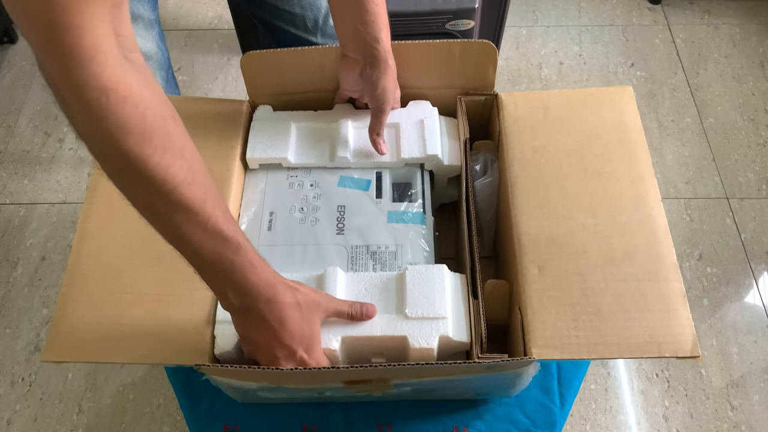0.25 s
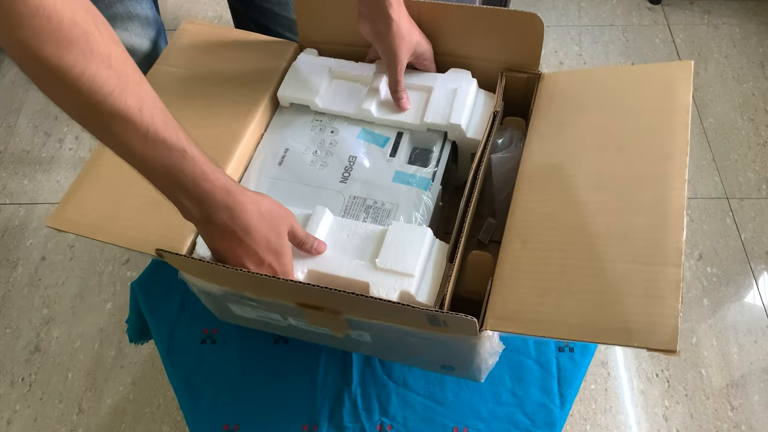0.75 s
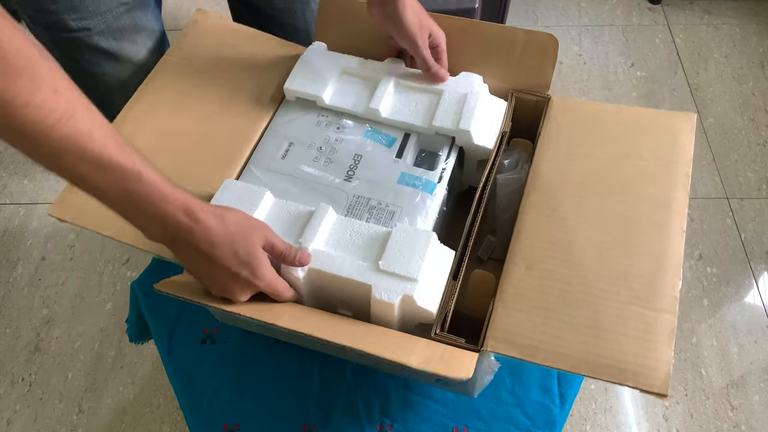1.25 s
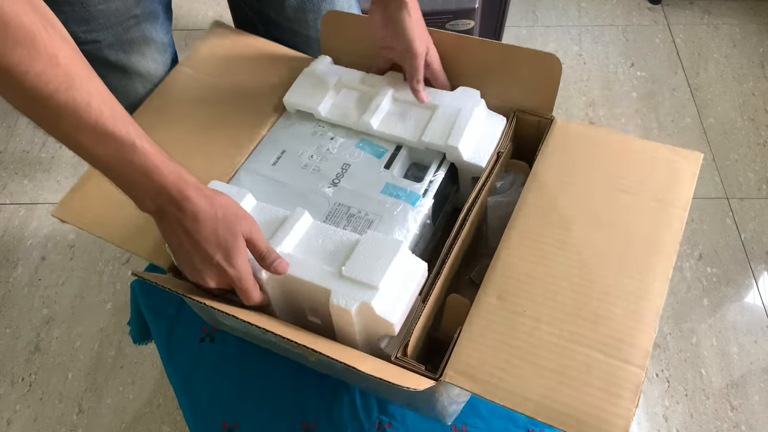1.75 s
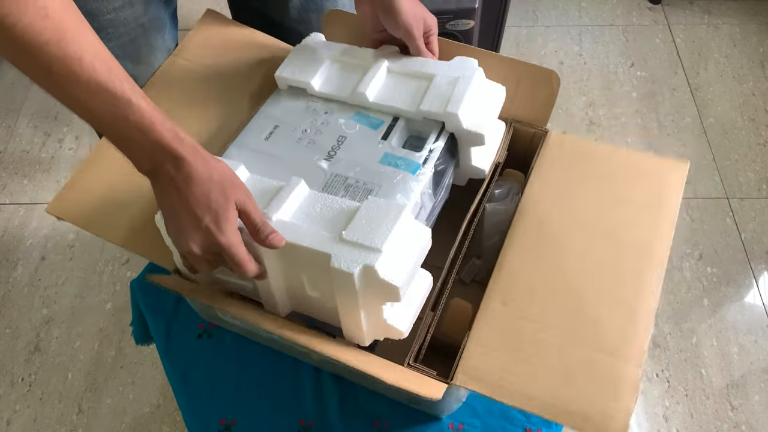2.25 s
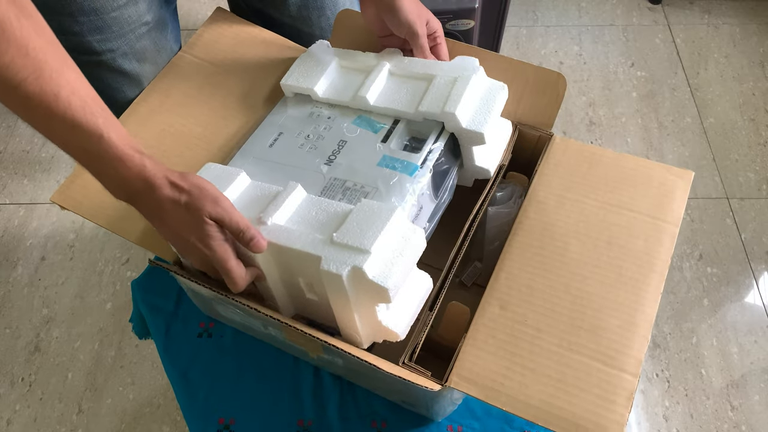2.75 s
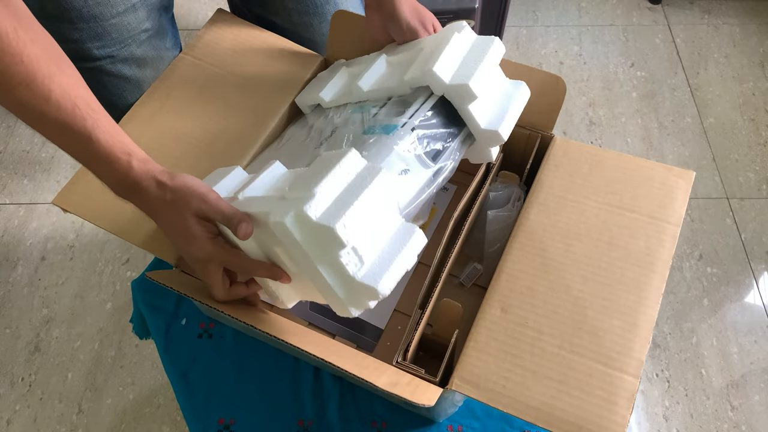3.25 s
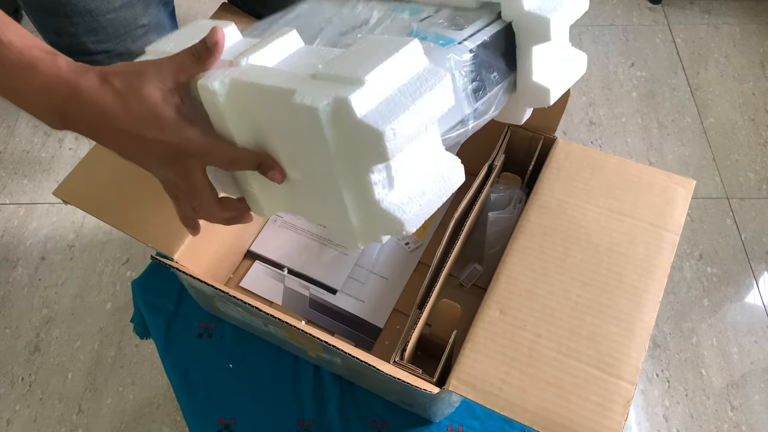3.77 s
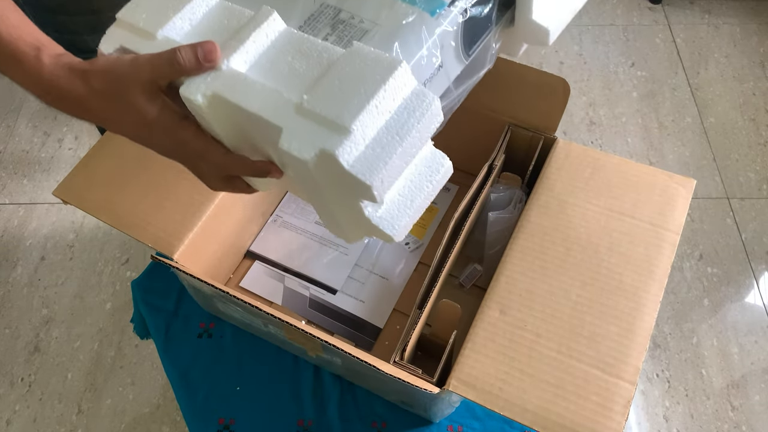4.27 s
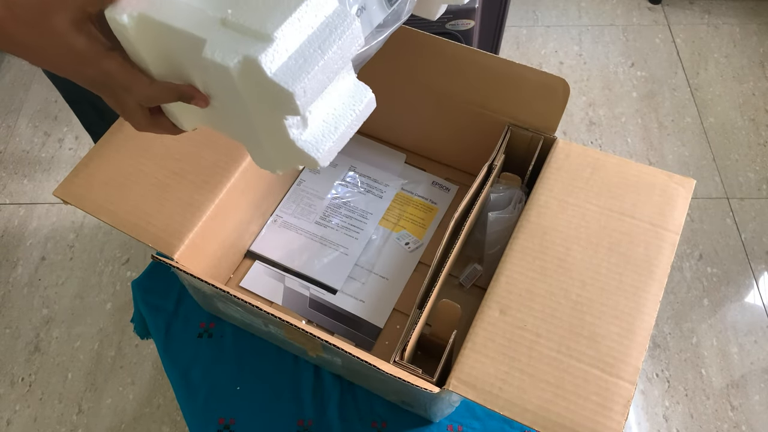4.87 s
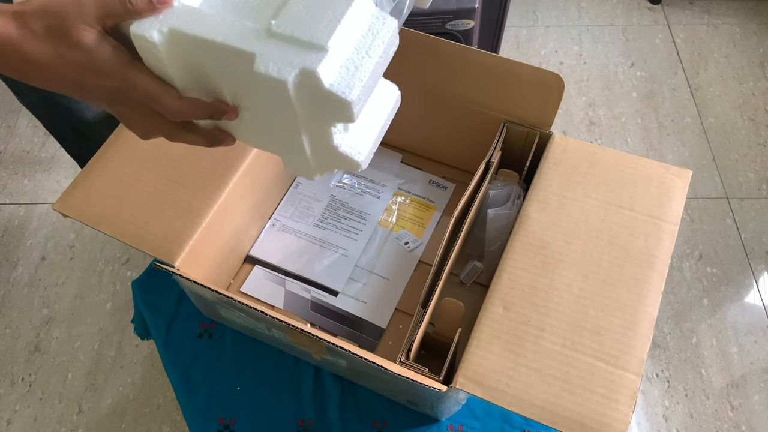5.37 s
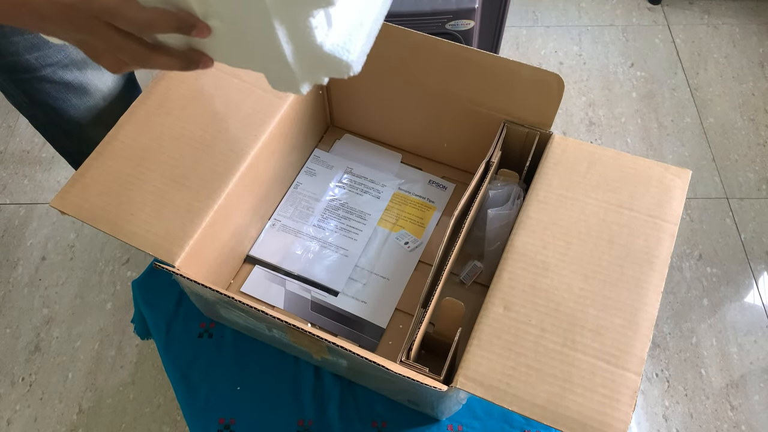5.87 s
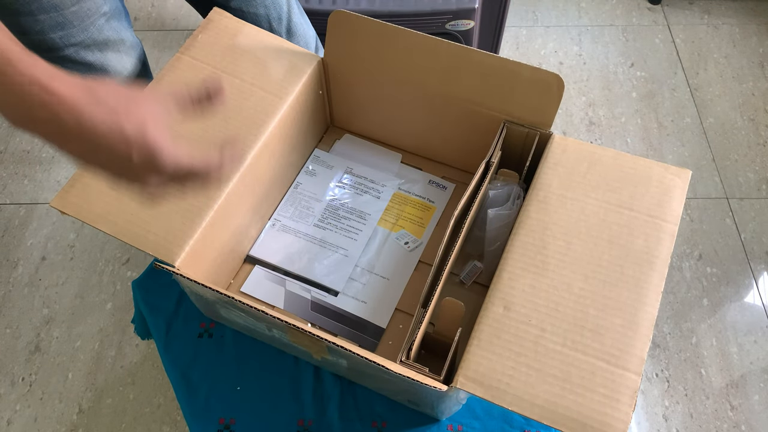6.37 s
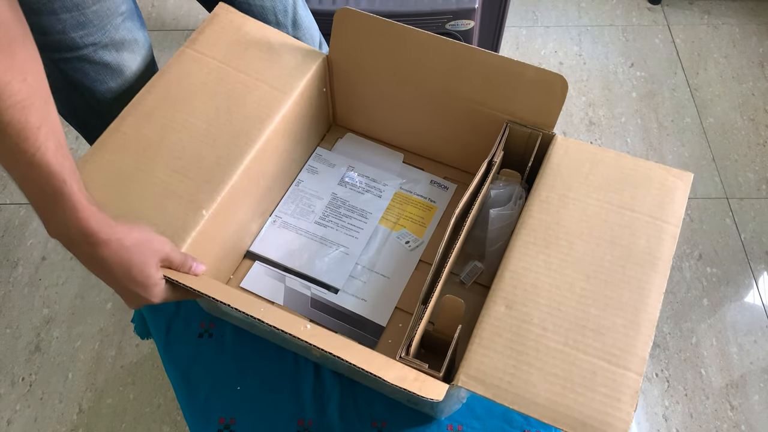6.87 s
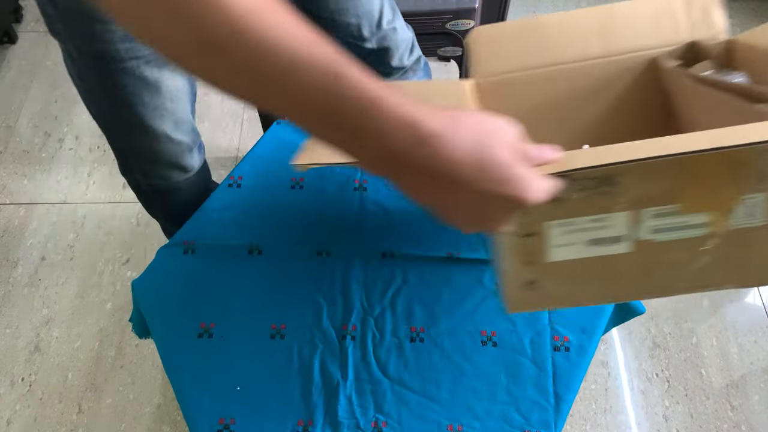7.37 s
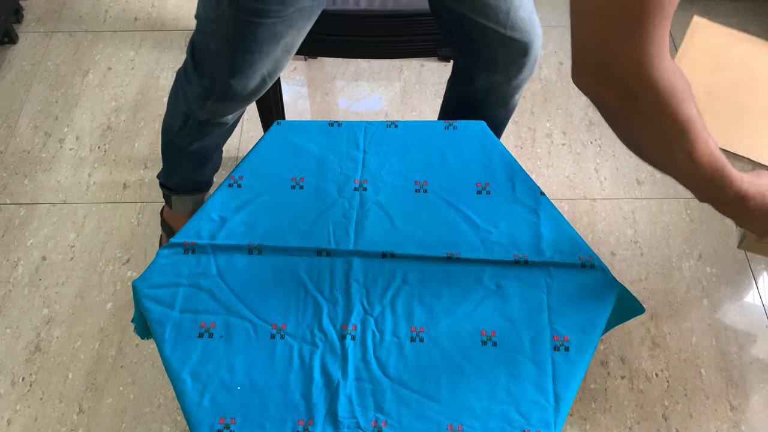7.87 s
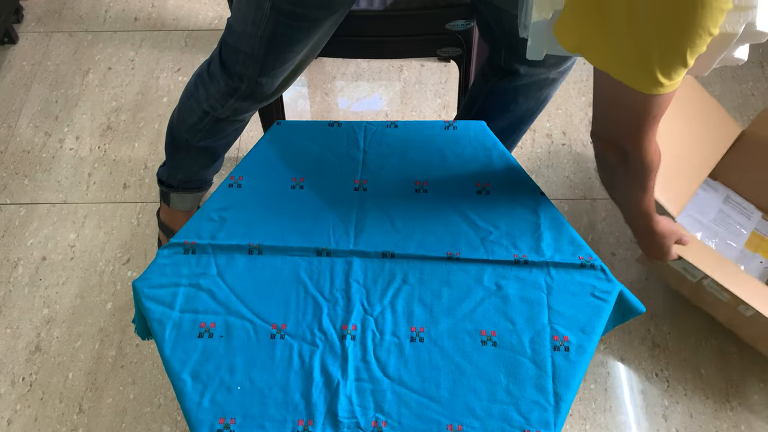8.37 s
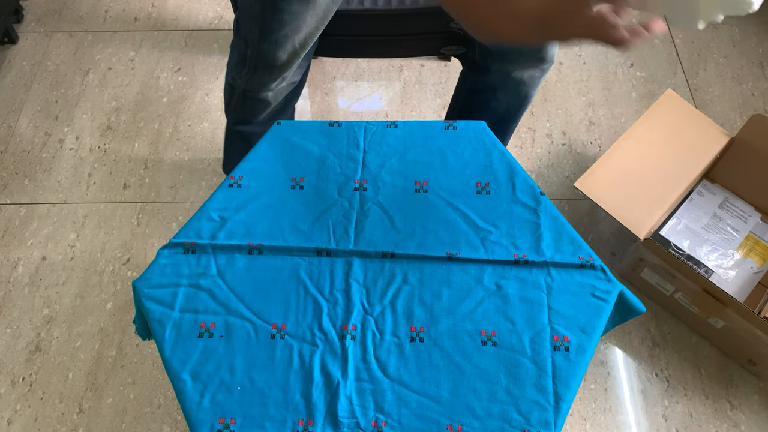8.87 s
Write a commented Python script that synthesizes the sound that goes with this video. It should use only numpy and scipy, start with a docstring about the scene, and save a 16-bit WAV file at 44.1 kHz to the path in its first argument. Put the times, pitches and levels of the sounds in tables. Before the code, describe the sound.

Polystyrene foam scrapes and squeaks out of a cardboard box as plastic wrap crackles, with hollow bumps before the box is set down.

```python
"""A fine, very bright scrape with short squeaks and snaps: polystyrene end caps stick and slip against
cardboard as a device is worked out of its box. Its plastic wrap crackles, panels rustle, gripped foam
creaks and stiff edges tick. The hollow box booms and knocks as it is bumped, then is carried aside and
set down in a hard-floored room."""
import sys
import numpy as np
from scipy import signal
from scipy.fft import rfft, irfft
from scipy.io import wavfile
from scipy.ndimage import uniform_filter1d

SR = 44100
rng = np.random.default_rng(int(sys.argv[2]) if len(sys.argv) > 2 else 0)


def store_pcm(level_fs):
    """Save levels as 16-bit WAV."""
    pcm = np.round(np.clip(level_fs, -1, 1) * 32767).astype(np.int16)
    wavfile.write(sys.argv[1], SR, np.atleast_2d(pcm).T)


N = 402480
TIME = np.arange(N) / SR


def undb(db):
    """Decibels to gain."""
    return 10 ** (np.asarray(db) / 20)


def unit(x):
    """Scale to an rms of 1."""
    return x / np.sqrt(np.mean(x ** 2))


def freqs(x):
    """Frequency of each bin of a signal's spectrum."""
    return np.arange(x.shape[-1] // 2 + 1) * SR / x.shape[-1]


def on_log_axis(hz, points):
    """Read (freq_hz, value) points on a log-frequency axis."""
    point_hz, value = np.transpose(points)
    return np.interp(np.log(np.maximum(hz, 1)), np.log(point_hz), value)


def colour(x, eq):
    """Shape a signal with an EQ curve of (freq_hz, gain_db) points."""
    return irfft(rfft(x) * undb(on_log_axis(freqs(x), eq)), x.shape[-1])


def drift(rate_hz):
    """Smooth random modulation with an rms of 1."""
    hold = max(int(SR / rate_hz), 2)
    steps = np.repeat(rng.standard_normal(N // hold + 1), hold)
    return unit(uniform_filter1d(uniform_filter1d(steps, hold), hold)[:N])


def add(track, start_s, sound):
    """Mix a sound into a track."""
    i = max(int(start_s * SR), 0)
    track[i:i + len(sound)] += sound[:max(N - i, 0)]


def slips(per_s, scatter_db, size=N):
    """Stick-slip: tiny jerks of unequal size at random moments."""
    happens = rng.random(size) < per_s / SR
    polarity = rng.choice([-1, 1], size)
    return happens * polarity * undb(scatter_db * np.clip(rng.standard_normal(size), -2, 2))


def stroke(length_s, attack_s, release_s, swell_db=0):
    """One second of envelope for a push: attack, a hold that can swell or sag, release."""
    t = TIME[:SR]
    progress = np.clip(t / max(length_s, .01), 0, 1)
    release = np.exp(-np.maximum(t - length_s, 0) / release_s)
    return np.minimum(t / attack_s, 1) * undb(swell_db * (progress - .5)) * release


# Pushes that shift the load, then the empty box: start_s, length_s, hiss_db, swell_db, rasp_db
PUSHES = [(0, 0.02, -34, -21, -38), (0.049, 0.04, -43, -5, -49), (0.12, 0.083, -42.5, 10.5, -46.5),
          (0.369, 0.16, -41, -0.5, -44.5), (0.581, 0.061, -49.5, 0, -48.5), (0.677, 0.21, -46.5, -9, -49),
          (0.913, 0.064, -31, 5, -60), (0.97, 0.17, -34.5, -9, -51), (1.096, 0.065, -32.5, 2.5, -60),
          (1.186, 0.027, -39.5, 0.5, -53), (1.272, 0.078, -54, 6, -69), (1.451, 0.15, -40.5, 27, -50),
          (1.71, 0.087, -31, -4, -35.5), (1.82, 0.089, -34, 12.5, -41), (1.947, 0.056, -39, 8.5, -39.5),
          (1.989, 0.083, -24.5, 5.5, -44.5), (2.097, 0.14, -28.5, -0.5, -41.5),
          (2.256, 0.097, -42, -5.5, -41), (2.378, 0.17, -36, 6.5, -41.5), (2.618, 0.11, -43.5, -8, -47.5),
          (2.722, 0.16, -29, 1, -36.5), (2.89, 0.091, -31.5, 2.5, -41.5), (2.976, 0.21, -38, 7.5, -41),
          (3.201, 0.036, -34.5, 9, -42), (3.305, 0.092, -39.5, -1, -43.5), (3.437, 0.23, -37.5, -2, -46.5),
          (3.704, 0.14, -38.5, -3, -42.5), (3.91, 0.08, -41, -2, -41), (4.036, 0.12, -36, 6, -44),
          (4.2, 0.18, -43.5, -8.5, -48), (4.368, 0.13, -39, 16, -53), (4.584, 0.13, -47.5, 8.5, -58.5),
          (4.732, 0.078, -42, -1, -55), (4.825, 0.11, -45.5, -2, -51), (4.974, 0.021, -33, 1.5, -70),
          (5.089, 0.11, -46, 3, -57), (5.274, 0.12, -53, -0.5, -54), (5.425, 0.063, -43.5, 1, -64),
          (5.5, 0.059, -39.5, 5.5, -59.5), (5.6, 0.12, -41, 13.5, -50), (5.77, 0.11, -55.5, 9.5, -72),
          (5.897, 0.21, -38.5, 0.5, -53), (6.127, 0.037, -43.5, 4, -51.5), (6.215, 0.16, -43, -8, -58),
          (6.373, 0.16, -54, 7, -70), (6.66, .02, -59, 0.5, -84), (6.743, 0.43, -55.5, 5.5, -55),
          (7.152, 0.45, -54.5, -2.5, -63), (7.572, 0.077, -49, 3, -55), (7.677, 0.26, -62.5, -12, -62),
          (7.962, 0.33, -64, -11.5, -68), (8.342, 0.18, -52.5, -12, -53.5), (8.503, 0.069, -40.5, 6.5, -43),
          (8.662, 0.093, -47.5, 20.5, -56.5), (8.777, 0.055, -51.5, 2, -49), (8.901, 0.029, -26, -1, -39.5),
          (8.973, 0.17, -47, -8, -49)]


def push_envelopes():
    """Foam hiss dies sooner than cardboard rasp after each push; overlapping pushes add in power."""
    power = np.zeros((2, N))
    for start_s, length_s, hiss_db, swell_db, rasp_db in PUSHES:
        hiss = stroke(length_s, attack_s=.035, release_s=.04, swell_db=swell_db)
        rasp = stroke(length_s, attack_s=.035, release_s=.067, swell_db=swell_db)
        add(power[0], start_s, (undb(hiss_db) * hiss) ** 2)
        add(power[1], start_s, (undb(rasp_db) * rasp) ** 2)
    return np.sqrt(power)


# Bright sizzle of foam: freq_hz, gain_db
FOAM_EQ = [(300, -59.5), (1000, -51.5), (1250, -22), (1550, -17), (2200, -31), (2900, -19), (5400, -18.5),
           (7600, -12), (8150, 2.5), (10000, 1.5), (12500, 2.5), (15500, 1)]
# Fuller rasp of cardboard: freq_hz, gain_db
CARDBOARD_EQ = [(300, -16), (800, -11.5), (1400, -7.5), (2200, -4.5), (3100, -2.5), (4200, -9.5),
                (6000, -7), (8000, 3), (11000, -8.5), (16000, -32.5)]


def scraping(hiss, rasp):
    """Foam beads catch and slip thousands of times a second; the cardboard rasps in gritty surges."""
    pressure = drift(110)
    beads = unit(colour(slips(per_s=5500, scatter_db=-1.5), FOAM_EQ))
    fibres = shifting_contact(colour(slips(per_s=1100, scatter_db=4), CARDBOARD_EQ))
    surges = undb(1.8 * drift(32))
    return beads * hiss * undb(1.7 * pressure + 6.5) + fibres * surges * rasp * undb(.44 * pressure - 1)


def shifting_contact(x):
    """As the contact shifts, each half-octave band swells and sinks on its own."""
    centres_hz = 1000 * 2 ** np.arange(0, 3.6, .5)
    spectrum, hz, out = rfft(x), freqs(x), 0
    for share in np.eye(len(centres_hz)):
        band = irfft(spectrum * on_log_axis(hz, list(zip(centres_hz, share))), N)
        out = out + band * undb(2.6 * drift(18))
    return unit(out)


# Crisp tone of the wrap: freq_hz, gain_db
WRAP_EQ = [(500, -22.5), (1500, -5.5), (4000, -5.5), (8000, -7.5), (9700, -15.5), (11500, 3.5), (15000, 5)]
# Level ride on the crackle, highest while the load hangs free: time_s, gain_db
WRAP_RIDE = [(0, -9), (3.3, -7), (3.7, -2), (5.4, -2), (6.4, -9)]


def crinkling(hiss, rasp):
    """With each push the plastic wrap buckles in little clusters of ticks, and single foam beads pop."""
    fold_fade_s = .0008
    folds = np.abs(slips(per_s=55, scatter_db=4.5))
    clusters = signal.lfilter([1], [1, -np.exp(-1 / (fold_fade_s * SR))], folds)
    crackle = unit(colour(clusters * slips(per_s=9000, scatter_db=3), WRAP_EQ))
    pops = unit(colour(slips(per_s=70, scatter_db=3), FOAM_EQ))
    ride = undb(np.interp(TIME, *np.transpose(WRAP_RIDE)))
    return crackle * rasp * ride + pops * hiss * undb(-7)


# Panels moving under the hands: start_s, level_db, length_s, pitch_hz
RUSTLES = [(0.0, -50.5, 0.12, 181.5), (0.03, -53.5, 0.27, 530), (0.389, -57.5, 0.29, 165),
           (0.44, -61, .13, 524), (0.689, -58.5, 0.15, 404), (1.505, -63, 0.26, 152),
           (1.74, -39, 0.098, 437), (1.793, -51, 0.42, 217), (2.43, -50, 0.71, 234),
           (3.294, -49.5, 0.226, 216.6), (3.516, -56.5, 0.24, 232), (3.773, -49.5, 0.12, 317),
           (3.963, -57.5, 0.28, 255), (5.237, -59.5, 0.15, 231), (5.64, -56.5, 0.048, 406),
           (6.166, -60, 0.14, 283), (6.735, -58.5, 0.382, 217), (7.186, -69, 0.24, 215),
           (7.414, -51.5, 0.054, 250), (7.573, -53, 0.15, 274), (7.739, -60.5, 0.13, 310),
           (8.106, -59.5, 0.37, 94), (8.369, -49.5, 0.085, 240), (8.493, -47, 0.2, 162),
           (8.657, -53, 0.49, 86)]
# Dull tone of a panel: pitch_ratio, gain_db
PANEL_EQ = [(.12, -29), (.28, 0), (.55, -1), (1, 2.5), (1.45, -3), (2, -8), (4, -11.5), (6.5, -20),
            (18, -22.5), (60, -40.5)]


def rustling():
    """The large panels drag and flex with a dull rustle that starts and stops with the hand."""
    out = np.zeros(N)
    for start_s, level_db, length_s, pitch_hz in RUSTLES:
        drag = colour(rng.standard_normal(SR), [(ratio * pitch_hz, db) for ratio, db in PANEL_EQ])
        envelope = stroke(length_s, attack_s=.0057, release_s=.019)
        add(out, start_s, undb(level_db + 2.5) * unit(drag) * envelope)
    return out * undb(.93 * drift(45))


# Sharp snaps of foam and wrap: start_s, level_db, body_mix_db
SNAP_HITS = [(0.0312, -25, -8), (0.3598, -32.5, -4.5), (0.399, -19.5, -22), (0.617, -28, -12),
             (0.839, -32, -3), (1.4812, -18, -39), (2.309, -17, -12), (3.2127, -11, -6.5),
             (3.5585, -35, -9), (3.6897, -25, -10.5), (3.803, -25.5, 2.5), (3.897, -22, -6),
             (4.051, -31, -2.5), (4.059, -36, -2), (4.0793, -39, 1), (4.241, -29.5, -7),
             (4.848, -29, -31.5), (4.932, -28, -7), (4.3836, -31, -1.5), (4.838, -13, -30.5),
             (4.97, -18.5, -13.5), (5.067, -31, -8), (5.1073, -26.5, -43), (5.321, -36.5, -7),
             (5.342, -31, -8), (5.359, -32, -19.5), (5.381, -32, -8), (5.454, -26.5, -26.5),
             (6.261, -15, -19), (6.3156, -28.5, -28), (6.768, -31, -10), (7.107, -24, -9.5),
             (8.3578, -27, -4), (8.918, -22.5, -3)]


def snapping():
    """A caught edge jumps free: a crack and a faint after-rattle, bright foam over a cardboard body."""
    out, t = np.zeros(N), TIME[:SR // 10]
    attack_s, crack_fade_s, rattle_fade_s = .0002, .0011, .016
    attack = 1 - np.exp(-t / attack_s)
    decay = np.exp(-t / crack_fade_s) + undb(-10.5) * np.exp(-t / rattle_fade_s)
    for start_s, level_db, body_mix_db in SNAP_HITS:
        foam = unit(colour(rng.standard_normal(len(t)), FOAM_EQ))
        body = unit(colour(rng.standard_normal(len(t)), CARDBOARD_EQ))
        burst = foam + undb(body_mix_db - 4) * body
        add(out, start_s, undb(level_db + 1) * burst * attack * decay)
    return out


# Short squeaks as the foam lets go: peak_s, level_db
SQUEAK_HITS = [(.036, -34.5), (1.251, -35.5), (1.606, -22.5), (3.223, -17.5), (3.808, -27.5),
               (3.965, -31.5), (4.271, -26.5), (4.512, -32), (4.697, -32), (5.471, -34.5), (5.935, -39),
               (6.103, -30), (6.316, -25), (8.543, -32), (8.924, -37)]
# Thin, high tone of a squeak: freq_hz, gain_db
SQUEAK_EQ = [(300, -70), (1400, -38), (3200, -20), (7000, -31), (9000, 12), (11000, 4.5), (13500, 6.5),
             (15500, 7.5)]


def squeaking():
    """A quick run of slips swells and stops as the foam skids a short way."""
    envelope = np.zeros(N)
    lead_s, slope_s = .04, .0035
    swell = 1 / np.cosh((TIME[:int(2 * lead_s * SR)] - lead_s) / slope_s)
    for peak_s, level_db in SQUEAK_HITS:
        add(envelope, peak_s - lead_s, undb(level_db + 10) * swell)
    return envelope * unit(colour(slips(per_s=9200, scatter_db=2.5), SQUEAK_EQ))


# Dry ticks as a cardboard edge catches or cracks, and near 7.1 s a loose plastic part clicks inside the box:
# start_s, level_db, pitch_hz, fade_s
TICK_HITS = [(0.0567, -24.5, 1300, 0.00055), (0.4193, -35.5, 1410, 0.0025), (0.744, -30, 1350, 0.0016),
             (1.48, -41, 1970, 0.0011), (1.742, -16, 1200, 0.0015), (2.56, -30, 1500, 0.0013),
             (2.569, -23, 1967, 0.00096), (3.0855, -25.5, 1500, .0016), (3.089, -25.5, 2400, 0.0012),
             (3.214, -16, 2100, 0.00079), (3.2233, -21, 1900, 0.00084), (3.2262, -11, 1290, 0.001),
             (3.2298, -20, 780, .0025), (3.843, -32, 1870, .002), (4.272, -30.5, 3020, .002),
             (5.6806, -33, 1400, .002), (5.6902, -32.5, 1700, .002), (7.1036, -34, 2490, .003),
             (7.107, -32, 4140, 0.0022)]
# Partials of a stiff edge: pitch_ratio, gain_db
EDGE_MODES = [(1, 1), (1.32, -4), (1.8, -4), (2.701, -10)]


def ticking():
    """A stiff edge springs free, or a loose plastic part clicks, and rings for only a few cycles, its upper
    partials dying first."""
    out, t = np.zeros(N), TIME[:SR // 25]
    for start_s, level_db, pitch_hz, fade_s in TICK_HITS:
        ring = sum(undb(db) * np.sin(2 * np.pi * ratio * pitch_hz * t) * np.exp(-t * ratio ** .5 / fade_s)
                   for ratio, db in EDGE_MODES)
        ring *= 1 - np.exp(-t * pitch_hz * 2)  # half-cycle attack
        add(out, start_s, undb(level_db) * ring / np.abs(ring).max())
    return out


# Gripped foam or cardboard creaks and grates: start_s, length_s, level_db, pitch_hz, width_hz
CREAK_GRIPS = [(0.062, .14, -60, 950, 600), (0.44, .06, -56.5, 1900, 900), (2.765, .02, -48.5, 1683, 250),
               (3.235, .04, -46.5, 2500, 1200), (4.46, .073, -60, 1500, 200),
               (5.313, .08, -60.5, 1820, 1600), (5.628, .13, -52.5, 2400, 1800),
               (5.678, .021, -47, 1700, 1910), (5.815, .37, -63, 1470, 130), (5.89, .007, -57, 1350, 200),
               (7.835, 0.02, -57, 780, 180)]


def creaking():
    """Slow slips under the fingers ring the foam cap or a flap, each grip at its own pitch."""
    out = np.zeros(N)
    for start_s, length_s, level_db, pitch_hz, width_hz in CREAK_GRIPS:
        edges_hz = [pitch_hz / (1 + width_hz / pitch_hz / 2), pitch_hz + width_hz / 2]
        resonance = signal.butter(2, edges_hz, "band", fs=SR, output="sos")
        ring = signal.sosfilt(resonance, slips(per_s=900, scatter_db=4, size=SR))
        add(out, start_s, undb(level_db) * unit(ring) * stroke(length_s, attack_s=.005, release_s=.012))
    return out


# Hollow bumps of the box: start_s, level_db, pitch_hz, ring_mix_db
BOOM_HITS = [(0.21, -21, 173, -9), (0.46, -36.5, 150, -13), (1.482, -44, 152, -18), (1.603, -9.5, 187, -8),
             (1.742, -23.5, 236, 1.5), (2.219, -14.5, 182, -10), (2.246, -17, 145, -3),
             (2.331, -18, 213, -8), (2.561, -17.5, 228, -5.5), (2.57, -15.5, 284, -9),
             (2.833, -14, 290, -7.5), (3.057, -27, 220, -9), (3.159, -8.5, 199, -21),
             (3.19, -6.5, 295, -24), (3.198, -21.5, 335, -16), (3.204, -19.5, 135, -5),
             (3.273, -22, 216, -11), (3.866, -33, 258, -5), (7.187, -49.5, 230, -7), (7.59, -43, 290, -1.5),
             (7.72, -37.5, 292, -4), (8.362, -8, 245, -9.5), (8.373, -12.5, 284, -11),
             (8.41, -15.5, 285, -13), (8.453, -15.5, 263, -17), (8.922, -20.5, 110, -9)]
# Resonances of the box: freq_hz, gain_db, t60_s
BOX_MODES = [(81.4, 1, 0.15), (117.4, -3.5, 0.38), (144, -12, 0.89), (175.3, -2.5, 0.35), (204.6, 0, 0.22),
             (229, -5, 0.18), (285.6, -2.5, 0.037), (336, -0.5, 0.13), (374, -6, 0.081), (431.5, -8, 0.051),
             (566, -6, 0.076)]


def booming():
    """A soft blow heaves one panel for a few cycles; the box modes near that pitch ring on."""
    out, t = np.zeros(N), TIME[:SR // 2]
    mode_hz, mode_db, t60_s = np.transpose(BOX_MODES)[:, :, None]
    ring_attack_s, heave_peak_s = .0053, .0057
    ring_envelope = (1 - np.exp(-t / ring_attack_s)) * np.exp(-np.log(1000) * t / t60_s)
    age = t / heave_peak_s
    for start_s, level_db, pitch_hz, ring_mix_db in BOOM_HITS:
        detune, polarity = rng.standard_normal((2, len(BOX_MODES), 1))
        weight = undb(mode_db - 1.9 * np.log2(mode_hz / pitch_hz) ** 2) * np.sign(polarity)
        modes = weight * np.sin(2 * np.pi * mode_hz * (1 + .035 * detune) * t) * ring_envelope
        ring = modes.sum(axis=0) / np.linalg.norm(weight)
        heave = age ** 2 * np.exp(2 * (1 - age)) * np.sin(2 * np.pi * pitch_hz * t)
        add(out, start_s, undb(level_db - 4) * heave + undb(level_db + ring_mix_db) * ring)
    return out


# Dull knocks on the cardboard walls: start_s, level_db, pitch_hz, fade_s
KNOCK_HITS = [(0.213, -26.5, 450, 0.013), (0.214, -37.5, 950, 0.015), (1.744, -22.5, 475, 0.014),
              (2.573, -26, 390, 0.0083), (2.833, -21.5, 390, 0.0025), (3.186, -26.5, 620, 0.011),
              (3.228, -29.5, 1000, 0.014), (3.23, -27.5, 430, 0.026), (3.866, -33, 447, 0.0042),
              (4.165, -35.5, 462, 0.0048), (5.69, -43, 658, 0.006), (8.362, -32, 540, 0.036),
              (8.555, -41.5, 700, 0.039), (8.923, -29.5, 610, 0.028), (8.966, -36, 700, 0.016)]
# Tone of a knock's slap: pitch_ratio, gain_db
SLAP_EQ = [(.17, -14.5), (.5, -2.5), (1, 1), (1.26, -1.5), (5, -30), (20, -49.5)]


def knocking():
    """A blow on a wall of the box: one heavily damped ring inside a dull, broad slap."""
    out, t = np.zeros(N), TIME[:SR // 5]
    for start_s, level_db, pitch_hz, fade_s in KNOCK_HITS:
        noise = colour(rng.standard_normal(len(t)), [(ratio * pitch_hz, db) for ratio, db in SLAP_EQ])
        slap = unit(noise) * np.exp(-t / fade_s)
        ring = np.sin(2 * np.pi * pitch_hz * t) * np.exp(-t * pitch_hz / 5)
        attack = 1 - np.exp(-t * pitch_hz * 2)
        add(out, start_s, undb(level_db + 2.5) * (slap + undb(-6) * ring) * attack)
    return out


# Single folds of the wrap flick over: start_s, level_db
FLICK_HITS = [(0.5537, -27), (1.0053, -15), (2.4024, -38), (2.7195, -31), (3.9657, -25), (4.2428, -29),
              (4.2736, -16), (4.3853, -27), (4.7657, -23), (4.8372, -14.5), (4.9706, -19), (5.068, -22),
              (5.3979, -29), (5.473, -25), (6.11, -19), (6.4519, -29), (6.7685, -23), (7.2613, -33),
              (8.9973, -21)]


def flicking():
    """A taut fold of plastic flips: a few very high cycles, gone in about a millisecond."""
    out, t = np.zeros(N), TIME[:SR // 100]
    centre_hz, rise_s = 12800, .00022
    age = t / rise_s
    for start_s, level_db in FLICK_HITS:
        pitch_hz = centre_hz * (1 + .04 * rng.standard_normal())
        add(out, start_s, undb(level_db) * age * np.exp(1 - age) * np.sin(2 * np.pi * pitch_hz * t))
    return out


# How alike left and right are in diffuse sound: freq_hz, correlation
STEREO_LIKENESS = [(150, 1), (280, 1), (420, 1), (700, 0.67), (1100, 0.3), (1600, 0.27), (3000, 0.2)]


def diffuse(size):
    """Stereo noise from all sides: mono in the bass, wide in the treble."""
    mid, side = rfft(rng.standard_normal((2, size)))
    alike = on_log_axis(freqs(np.empty(size)), STEREO_LIKENESS)
    mid, side = mid * np.sqrt(1 + alike), side * np.sqrt(1 - alike)
    return unit(irfft([mid + side, mid - side], size))


def wandering(x, responses):
    """The point of contact keeps moving, so the sound crossfades between patterns of reflections."""
    blend = np.array([drift(6) for _ in responses])
    blend /= np.linalg.norm(blend, axis=0)
    return sum(signal.oaconvolve((x * share)[None], response, axes=1)[:, :N]
               for share, response in zip(blend, responses))


# Tone of the reflections inside the open box: freq_hz, gain_db
BOX_ECHO_EQ = [(100, -30), (300, -18.5), (520, -9.5), (1000, 1.5), (2000, 0.5), (4500, 1), (6500, 2.5),
               (10000, -39), (16000, -7.5)]


def box_echoes(x):
    """Sound rattles between the walls of the box for a few milliseconds, favouring no single pitch."""
    t, decay_s = TIME[:SR // 12], .0056
    fade = np.linspace(1, 0, len(t)) ** 2
    responses = []
    for _ in range(7):
        burst = diffuse(len(t)) * np.exp(-t / decay_s)
        flat_burst = irfft(np.exp(1j * np.angle(rfft(burst))), len(t))  # phase only: no resonances
        responses.append(colour(flat_burst, BOX_ECHO_EQ) * fade)
    return wandering(x, responses)


# Tone of the room's reverb: freq_hz, gain_db
REVERB_EQ = [(40, 1.5), (130, 1), (250, -3.5), (450, 4.5), (1200, -1), (3000, -3.5), (5000, 4), (7500, -10),
             (11000, -38), (16000, -13)]
# Length of the reverb: freq_hz, t60_s
REVERB_DECAY = [(100, 0.68), (400, 0.4), (1200, 0.54), (3500, 0.84), (12000, 0.05)]


def room_response():
    """One diffuse return of floor and walls; the beamed top treble hardly excites it."""
    t, attack_s = TIME[:SR], .0029
    hz, tail = freqs(t), 0
    spectrum = rfft(diffuse(SR)) * undb(on_log_axis(hz, REVERB_EQ))
    centres_hz = 62.5 * 2 ** np.arange(9)
    for centre_hz, share in zip(centres_hz, np.eye(len(centres_hz))):
        band = irfft(spectrum * on_log_axis(hz, list(zip(centres_hz, share))), SR)
        t60_s = on_log_axis(centre_hz, REVERB_DECAY)
        envelope = np.exp(-np.log(1000) * t / t60_s) * (1 - np.exp(-t / attack_s))
        tail = tail + band * unit(envelope) / SR ** .5
    return tail


# Tone of the still air: freq_hz, gain_db
AIR_EQ = [(18, -41), (30, -2), (108, -4), (473, -20), (557, -15), (1790, -10.5), (2490, -36), (3450, -11.5),
          (8000, -15.5), (10400, -51.5), (17600, -120)]


def room_tone():
    """A faint, low bed of still air from all sides."""
    return unit(colour(diffuse(N), AIR_EQ)) * undb(-71)


# How far the left microphone leads the right for direct sound: freq_hz, phase_rad
LEFT_LEAD = [(320, 0), (460, -1.3), (750, -1.8), (1100, -1.3), (1500, -.7), (2240, -.7), (3300, -1.8),
             (4000, -1.2), (5000, 0), (6600, .4), (9040, 3), (10200, 3.6), (12600, 6), (13700, 6.6),
             (15800, 8.5)]


def scene():
    """Direct sound plus sends to box and room; booms fill the room most, flicks stay dry."""
    hiss, rasp = push_envelopes()
    friction = scraping(hiss, rasp) + crinkling(hiss, rasp) + creaking() + snapping() + squeaking()
    panels, booms, knocks, ticks = rustling(), booming(), knocking(), ticking()
    left = friction + panels + booms + knocks + ticks + flicking()
    right = irfft(rfft(left) * np.exp(-1j * on_log_axis(freqs(left), LEFT_LEAD)), N)
    echoes = box_echoes(friction + panels + booms + undb(-5) * knocks + undb(-12.5) * ticks)
    send = undb(-4.5) * friction + undb(-18) * panels + undb(-2) * booms + undb(-7.5) * (knocks + ticks)
    reverb = wandering(send, [room_response() for _ in range(3)])
    return np.array([left, right]) + echoes + reverb + room_tone()


def record(dry):
    """The small microphones lose the deep bass; a steep low-pass cuts the very top."""
    low_cut_hz, high_cut_hz = 47, 15750
    thinned = signal.sosfilt(signal.butter(3, low_cut_hz, "high", fs=SR, output="sos"), dry)
    return signal.sosfilt(signal.ellip(10, .2, 70, high_cut_hz, fs=SR, output="sos"), thinned)


dry = scene()
out = record(dry)
store_pcm(out)
```